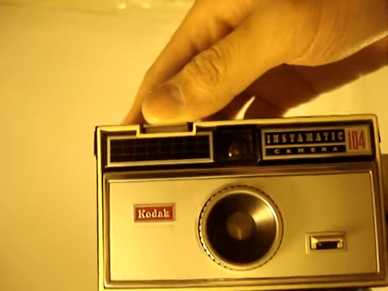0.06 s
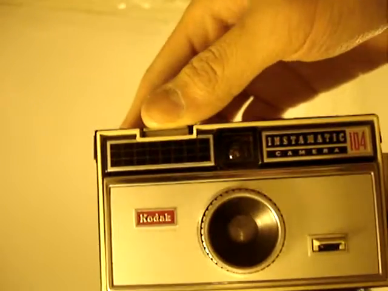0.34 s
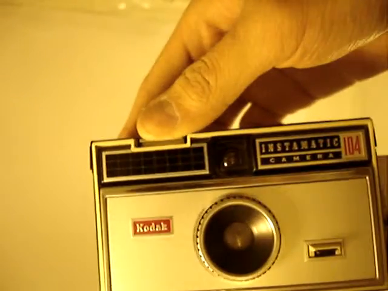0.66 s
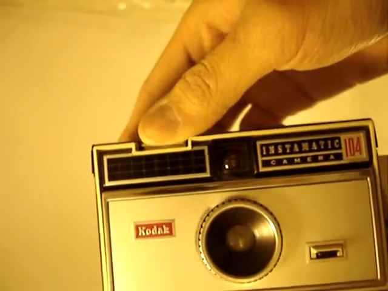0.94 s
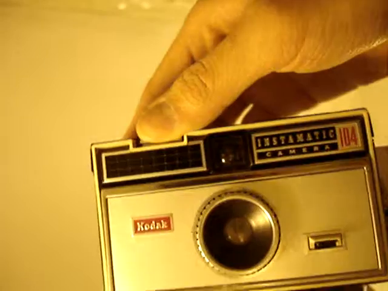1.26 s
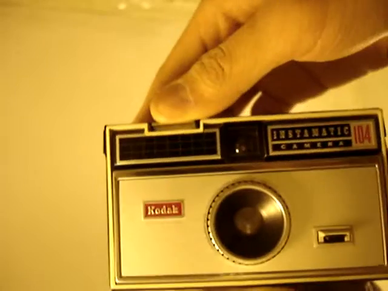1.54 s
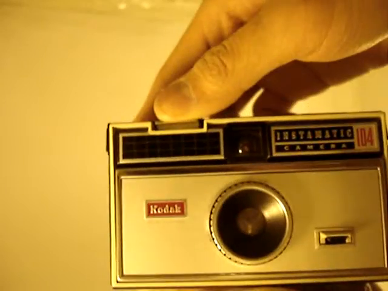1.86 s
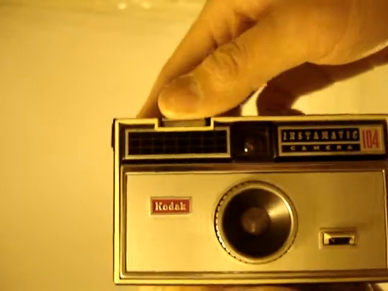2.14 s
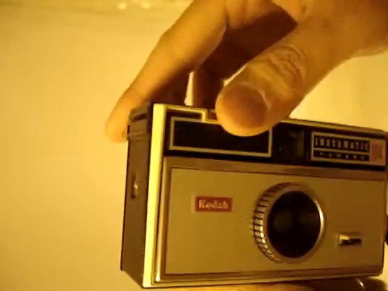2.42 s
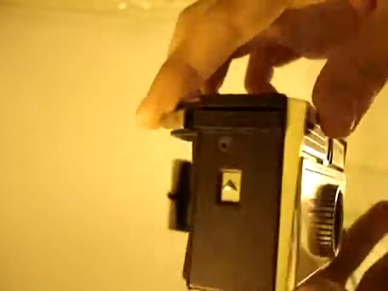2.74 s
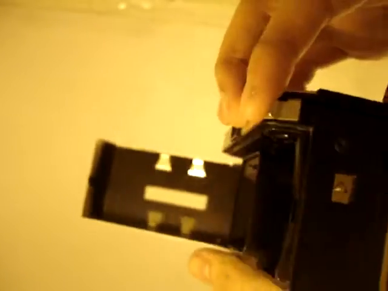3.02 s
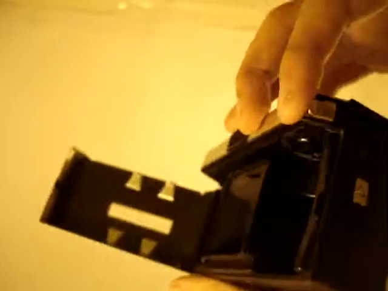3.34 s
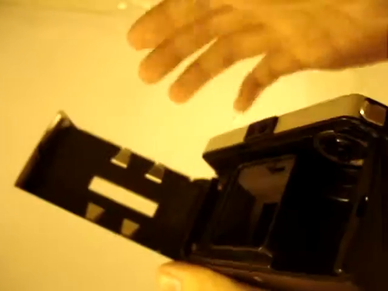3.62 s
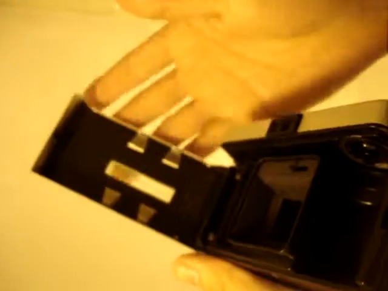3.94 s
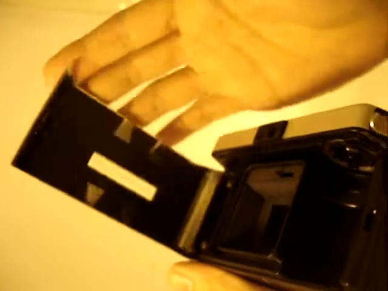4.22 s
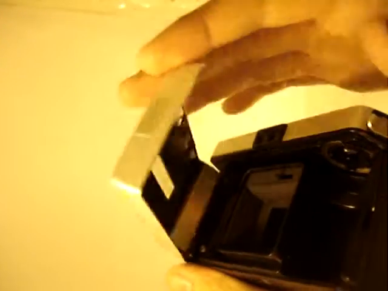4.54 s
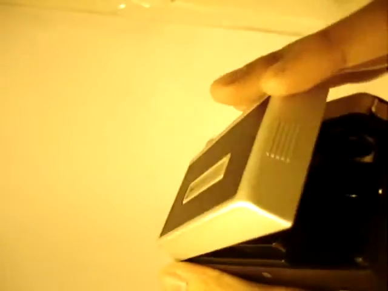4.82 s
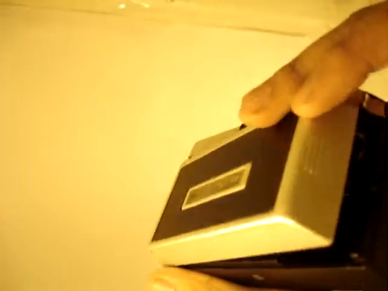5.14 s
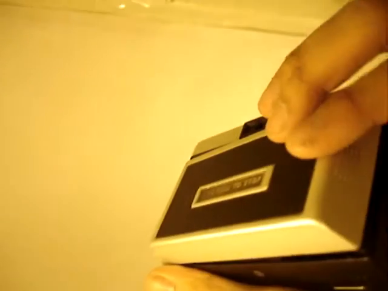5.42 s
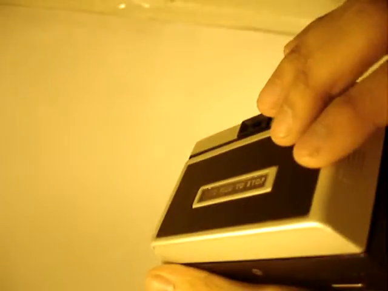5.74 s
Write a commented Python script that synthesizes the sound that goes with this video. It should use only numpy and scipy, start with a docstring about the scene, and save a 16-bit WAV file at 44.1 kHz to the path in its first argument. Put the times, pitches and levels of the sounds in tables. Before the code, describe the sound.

Quiet hiss, mains buzz and a thin whine run throughout. A small film camera gives two faint knocks, then its shutter snaps sharply and the release springs back with metallic clicks. Fingers rub softly on the case while the hinged back is unlatched and swung open with light clicks. Finally the back claps shut, followed by two dull knocks. The microphone is close, in a hard-walled room with a short echo.

```python
"""First comes a quiet hiss with mains buzz and a thin whine, then two faint knocks on a small film camera.
Close by, its shutter snaps and the release springs back; fingers rub the case, and the hinged back
is unlatched, swung open and clapped shut. Each contact chatters briefly, rings the metal works or
the hollow case, and echoes in a hard-walled room. The recorder turns itself down at the loud snaps
and creeps back up over seconds."""
import sys
import numpy as np
from scipy import signal
from scipy.fft import rfft, irfft
from scipy.io import wavfile
from scipy.ndimage import uniform_filter1d, minimum_filter1d

SR = 44100
rng = np.random.default_rng(int(sys.argv[2]) if len(sys.argv) > 2 else 0)


def transcribe(signal):
    """Save signal, clipped to [-1, 1], as a 16-bit WAV file at the path in sys.argv[1]."""
    frames = np.atleast_2d(signal).T
    limited = np.clip(frames, -1, 1)
    pcm = np.round(limited * 32767).astype(np.int16)
    wavfile.write(sys.argv[1], SR, pcm)


N = 263718
SPAN = 32768  # samples set aside for one short sound
TOP_HZ = 10030  # the recorder cuts off above this
TIME = np.arange(N) / SR
AGE = TIME[:SPAN]  # seconds since a short sound began
FREQS = np.fft.rfftfreq(SPAN, 1 / SR)


def undb(db):
    """Turn decibels into a number to multiply by."""
    return 10 ** (np.asarray(db) / 20)


def along(points, hz):
    """Read between (frequency, value) points, with octaves evenly spaced."""
    f, value = np.transpose(points)
    return np.interp(np.log(hz + 1), np.log(f), value)


def add(out, s, sound):
    """Mix a sound in, starting at s seconds."""
    start = int(s * SR)
    out[start:start + len(sound)] += sound[:len(out) - start]


def resonance(hz, width):
    """A filter that passes hz fully and fades away on both sides."""
    return 1j * FREQS * width / (hz ** 2 - FREQS ** 2 + 1j * FREQS * width)


def unit_power(response):
    """Scale a filter to an average power of 1 below TOP_HZ."""
    return response / np.sqrt(np.mean(np.abs(response[FREQS < TOP_HZ]) ** 2))


def causal(gain):
    """The quickest filter with this tone colour that never sounds before it is struck."""
    cepstrum = irfft(np.log(gain + np.finfo(float).eps))
    cepstrum[1:SPAN // 2] *= 2
    cepstrum[SPAN // 2 + 1:] = 0
    return np.exp(rfft(cepstrum))


def flatten(burst, smooth_hz):
    """The spectrum of a burst with its broad tone colour evened out, leaving the fine grain."""
    spectrum = rfft(burst)
    power = uniform_filter1d(np.abs(spectrum) ** 2, int(smooth_hz * SPAN / SR) + 1)
    return spectrum / causal(np.sqrt(np.abs(power)))


def noise(colour):
    """Noise of strength 1, coloured by (frequency, level) points."""
    gain = undb(along(colour, np.fft.rfftfreq(N, 1 / SR)))
    x = irfft(rfft(rng.standard_normal(N)) * gain, N)
    return x / x.std()


# Tone colour of the room's low rush: f/Hz, relative level/dB
RUSH_COLOUR = [(25, -2.5), (60, -3), (130, 0), (240, 6.5), (400, 1), (800, -1), (1500, -7), (3000, -13),
               (8000, -44)]
def room_rush(level_db=-60):
    """The quiet room gives a steady, low rush."""
    return undb(level_db) * noise(RUSH_COLOUR)


# Tone colour of the buzz: f/Hz, relative level/dB
BUZZ_COLOUR = [(60, -11.5), (130, -7.5), (230, 0), (420, -1), (850, -5), (1500, -16), (4000, -34.5)]
def mains_buzz(level_db=-63, mains_hz=60, scatter_db=3):
    """Each cycle of the mains power makes one small spike of uneven size."""
    cycles = np.arange(0, N, SR / mains_hz).astype(int)
    spikes = np.zeros(N)
    spikes[cycles] = -undb(scatter_db * rng.standard_normal(len(cycles)))
    pulse = irfft(causal(undb(along(BUZZ_COLOUR, FREQS))))
    buzz = signal.fftconvolve(spikes - spikes.mean(), pulse)[:N]
    return undb(level_db) * buzz / buzz.std()


# Tone colour of the hiss, also used for the palms: f/Hz, relative level/dB
HISS_COLOUR = [(30, -15), (500, 0), (1500, 2.5), (3000, 0), (6000, -2), (8000, -7.5), (10000, -27.5)]
def microphone_hiss(level_db=-63.5):
    """The microphone hisses steadily."""
    return undb(level_db) * noise(HISS_COLOUR)


# Tone colour of the recorder's bright hiss: f/Hz, relative level/dB
RECORDER_COLOUR = [(30, -59), (3000, 1.5), (6000, 2.5), (8500, 7.5), (10000, 4), (12000, -20)]
def recorder_noise(gain_db, hiss_db=-66.5, whine_db=-65.5, whine_hz=8018, restart_hz=31.25, follow=0.77):
    """The electronics hiss and whine; the whine follows a share of each change in gain."""
    whine = np.sqrt(2) * np.sin(2 * np.pi * whine_hz * (TIME % (1 / restart_hz)))  # restarts make it buzz
    return noise(RECORDER_COLOUR) * undb(hiss_db) + whine * undb(whine_db + follow * gain_db)


# Time an echo takes to fade by 60 dB at a dryness of 1: f/Hz, fade time/s
ECHO_FADE = [(100, 0.24), (600, 0.56), (1200, 0.46), (2500, 0.35), (5000, 0.36), (10000, 0.24)]
def room_echo(gap_s, dryness, build_s=0.0054, early_db=3, early_s=0.0062):
    """After a gap, near surfaces answer, then the walls; the middle pitches last longest."""
    white, tail = rfft(rng.standard_normal(SPAN)), 0
    edges = np.r_[0, np.geomspace(200, SR / 2, 12)]
    for lo, hi in zip(edges, edges[1:]):
        band = irfft(white * (FREQS >= lo) * (FREQS < hi))
        tail = tail + band * np.exp(-np.log(1000) * dryness * AGE / along(ECHO_FADE, (lo + hi) / 2))
    since = np.maximum(AGE - gap_s, 0)
    build_up = 1 - np.exp(-since / build_s)
    early_boost = undb(early_db * np.exp(-since / early_s))
    return flatten(tail * build_up * early_boost, smooth_hz=680)


# How loud the hands are as they turn the camera over: t/s, level/dB
PALM_LEVELS = [(2.2, -63.5), (2.5, -53.5), (3.4, -57), (4.4, -62), (5.6, -70.5)]
def palms(flutter_db=1.0, flutter_hz=22):
    """Palms shift on the case with a soft, uneven hiss."""
    flutter = np.interp(TIME * flutter_hz, np.arange(SPAN), rng.standard_normal(SPAN))
    level_db = np.interp(TIME, *np.transpose(PALM_LEVELS), left=-np.inf)
    return noise(HISS_COLOUR) * undb(level_db + flutter_db * flutter)


# Fingers sliding on the case: t/s, length/s, level/dB, ringing f/Hz
FINGER_RUBS = [(2.598, 0.11, -54.5, 2800), (2.607, 0.076, -52.5, 950), (2.901, 0.14, -49, 2520),
               (3.034, 0.11, -49, 2480), (3.206, 0.13, -50.5, 2800), (3.448, .12, -56, 4560),
               (4.103, 0.088, -59, 4500), (5.245, 0.076, -55, 2580)]
def fingers(grain_db=5, width_hz=400, scrape_db=-10):
    """Skin catches and slips in tiny steps: a broad scrape that rings one note of the case."""
    out = np.zeros(N)
    for s, length, db, hz in FINGER_RUBS:
        slips = rng.standard_normal(SPAN)
        slips *= undb(grain_db * np.repeat(rng.standard_normal(SPAN // 64), 64))
        rub = irfft(rfft(slips) * (resonance(hz, width_hz) + undb(scrape_db) * resonance(hz, 2 * hz)))
        swell = np.sin(np.pi * np.minimum(AGE / length, 1))
        add(out, s, rub / rub.std() * undb(db) * swell)
    return out


# Low thumps at the sharper snaps: t/s, level/dB
LOW_THUMPS = [(1.058, -19.5), (1.473, -17.5), (1.647, -36.5), (3.272, -50), (3.984, -46.5), (5.654, -41.5)]
def thumps(swing_hz=4.4, decay_s=0.056, phase_rad=0.38, rise_s=0.0001):
    """Each low thump starts suddenly, swings slowly through zero and settles."""
    out = np.zeros(N)
    envelope = (1 - np.exp(-AGE / rise_s)) * np.exp(-AGE / decay_s)
    swing = envelope * np.cos(2 * np.pi * swing_hz * AGE + phase_rad)
    for s, db in LOW_THUMPS:
        add(out, s, undb(db) * swing)
    return out


def body(notes, crack, ring_db, damping):
    """A struck object rings with narrow notes over a broad crack; damping widens and shortens them."""
    ring = sum(undb(2 * db) * np.abs(resonance(hz, width * damping)) ** 2 for hz, width, db in notes)
    return causal(np.sqrt(undb(2 * along(crack, FREQS)) + undb(2 * ring_db) * ring))


# Notes the case rings with: f/Hz, width before damping/Hz, relative level/dB
CASE_NOTES = [(518, 41, -9.5), (729.7, 40, -11), (1192, 26, 1.5), (1730, 153, -1), (1945, 23, -4),
              (2240, 50, -6.5), (2467, 23, 0.5), (2780, 75, -3), (3830, 40, -5.5), (4080, 42, -13),
              (4220, 30, -14), (4360, 49, -13), (5800, 43, -21), (6150, 140, -17)]
# Tone colour of its dry crack: f/Hz, relative level/dB
CASE_COLOUR = [(60, -17), (170, -17), (260, -6.5), (380, -17), (510, -12), (620, -8), (750, 0.5), (1050, 7),
               (1400, -5), (1850, -2), (2900, -3), (3400, -2), (5000, -4), (7500, -4), (10000, -16)]
def hollow_case():
    """How the hollow plastic case answers a tap."""
    return body(CASE_NOTES, CASE_COLOUR, ring_db=11.0, damping=1.1)


# Notes the metal parts ring with: f/Hz, width before damping/Hz, relative level/dB
METAL_NOTES = [(1048, 46, -4.5), (1184, 104, -2), (1343, 53, -7), (1713, 42, -7.5), (1810, 50, -5.5),
               (2025, 66, -8), (2256, 30, -6.5), (2700, 29, -2), (2892, 60, -4), (3940, 110, -2.5),
               (4300, 48, -9), (4590, 115, -8), (5770, 210, -8), (6600, 60, -5), (6770, 65, -2.5),
               (7330, 99, -17), (8830, 70, -19), (9430, 83, -8)]
# Tone colour of their dry crack: f/Hz, relative level/dB
METAL_COLOUR = [(60, -40.5), (520, -7), (800, -5), (1150, -2.5), (1600, 2), (2000, 4), (3300, 2.5),
                (4200, 1.5), (7000, 4), (10000, 3)]
def metal_works():
    """How the metal parts inside the camera answer a tap."""
    return body(METAL_NOTES, METAL_COLOUR, ring_db=12.0, damping=1.05)


def contact(force, response, echo, cutoff_hz, spot_hz, spot_db, bass_hz, spot_width):
    """A force rings an object and the room; softness dulls it, and the spot touched boosts one pitch."""
    # a small object sends little sound below bass_hz into the room
    walls = echo * causal(FREQS ** 2 / (FREQS ** 2 + bass_hz ** 2) + 0.0043)
    spot = 1 + (undb(spot_db) - 1) * resonance(spot_hz, spot_hz * spot_width)
    colour = response * causal(1 / np.sqrt(1 + (FREQS / cutoff_hz) ** 4))
    direct = unit_power(colour * spot) * flatten(force, smooth_hz=500)
    # the walls hear the object from all sides, which evens out its peaks and dips
    scattered = unit_power(colour * np.sqrt(spot)) * flatten(force, smooth_hz=30)
    return irfft(direct + walls * scattered)


def blows(table, response, echo, chatter_ms, halving_db, tick_ms, bass_hz, hard_hz=10000):
    """Each blow is a tick and a dying chatter, which is shorter for stronger or duller blows."""
    out = np.zeros(N)
    for s, db, cutoff_hz, spot_hz in table:
        decay_ms = chatter_ms * 2 ** (-db / halving_db) * (cutoff_hz / hard_hz) ** 0.5
        chatter = rng.standard_normal(SPAN) * np.exp(-AGE * 1e3 / decay_ms)
        force = chatter / np.linalg.norm(chatter)
        force[0] += tick_ms / decay_ms  # the opening tick
        hit = contact(force, response, echo, cutoff_hz, spot_hz,
                      spot_db=5.5, bass_hz=bass_hz, spot_width=0.15)
        add(out, s, undb(db) * hit)
    return out


# Knocks, ending with the back clapped shut: t/s, level/dB, dull above f/Hz, boosted f/Hz
CASE_KNOCKS = [ (0.4774, -25.5, 8000, 3520), (0.5156, -16, 7000, 1390), (3.2707, -11, 9000, 2400),
               (3.2925, -12.5, 6000, 1610), (4.7024, -24.5, 6000, 2310), (5.4622, -27.5, 6010, 2530),
               (5.6539, 8.5, 14000, 2800), (5.6580, 4.5, 5100, 1930), (5.7666, -2.5, 1470, 1110),
               (5.8545, -3, 1330, 1050)]
def knocks(echo, echo_db=-6.5):
    """Short knocks ring the hollow case."""
    return blows(CASE_KNOCKS, hollow_case(), echo * undb(echo_db),
                 chatter_ms=2.72, halving_db=19, tick_ms=0.58, bass_hz=293)


# Release lever, latch and hinge: t/s, level/dB, length/ms, dull above f/Hz, boosted f/Hz, boost/dB
METAL_SLIDES = [ (1.4620, 18.5, 12.3, 4600, 1220, 10), (1.4670, 21, 6.2, 12000, 4100, 9.5),
                (1.4715, 19.5, 6.2, 13100, 5700, 12.5), (1.6420, 11, 9.6, 12500, 4940, 9),
                (1.6520, 3.5, 20, 11000, 6500, 5), (1.9430, -16, 6.2, 6000, 4220, 13.5),
                (2.043, -21, 6, 7000, 4300, 4), (2.5552, -10.5, 11.5, 8100, 4860, 26),
                (3.2700, -11, 8, 7000, 4850, 19), (3.9352, -14, 8.9, 3700, 4320, 20),
                (3.9520, -20, 7.2, 4300, 4450, 16), (3.971, -1, 34.4, 5600, 4220, 15.5)]
def sliding_parts(echo, echo_db=-9.5):
    """A spring slides a metal part home; it chatters in a short burst that swells and dies."""
    out = np.zeros(N)
    metal, echo = metal_works(), echo * undb(echo_db)
    for s, db, length_ms, cutoff_hz, spot_hz, spot_db in METAL_SLIDES:
        swell = np.sin(np.pi * np.minimum(AGE * 1e3 / length_ms, 1))
        force = rng.standard_normal(SPAN) * swell
        slide = contact(force, metal, echo, cutoff_hz, spot_hz, spot_db, bass_hz=450, spot_width=0.087)
        add(out, s, undb(db) * slide)
    return out


# The shutter's blows: t/s, level/dB, dull above f/Hz, boosted f/Hz
SHUTTER_BLOWS = [ (1.0560, 11.5, 12900, 1950), (1.0657, 11.5, 7800, 1200), (1.0806, 6.5, 10900, 2600),
                 (1.0925, 4, 10000, 6700)]
def shutter(echo, echo_db=-3):
    """Four quick blows ring the metal works and blend into one snap."""
    return blows(SHUTTER_BLOWS, metal_works(), echo * undb(echo_db),
                 chatter_ms=6.3, halving_db=6.0, tick_ms=0.8, bass_hz=450)


def scene():
    """The camera and the hands holding it, over the steady background, in one channel."""
    metal_echo = room_echo(gap_s=0.0044, dryness=1.0)
    case_echo = room_echo(gap_s=0.002, dryness=1.86)
    camera = shutter(metal_echo) + sliding_parts(metal_echo) + knocks(case_echo)
    hands = fingers() + palms()
    background = room_rush() + mains_buzz() + microphone_hiss()
    return (background + hands + thumps() + camera)[None]


def auto_gain_db(x, threshold_db=-25, ratio=5.46, recovery_db_per_s=3, average_s=0.019):
    """The gain (the recorder's volume) drops just ahead of a loud snap and creeps back steadily."""
    window = int(average_s * SR)
    heard = signal.sosfilt(signal.butter(4, [300, TOP_HZ], "bandpass", fs=SR, output="sos"), x)
    level_db = 10 * np.log10(np.maximum(uniform_filter1d(heard ** 2, window), np.finfo(float).eps))
    cut_db = np.maximum(level_db - threshold_db, 0) * (1 - 1 / ratio)
    recovered_db = recovery_db_per_s * TIME
    gain_db = recovered_db - np.maximum.accumulate(cut_db + recovered_db)
    return minimum_filter1d(gain_db, 2 * window)


def record(dry):
    """The recorder adjusts its volume, adds its own hiss and whine, and cuts the highest treble."""
    gain_db = auto_gain_db(dry[0])
    mix = dry * undb(gain_db) + recorder_noise(gain_db)
    return signal.sosfilt(signal.ellip(12, .2, 70, TOP_HZ, fs=SR, output="sos"), mix)


dry = scene()
out = record(dry)
transcribe(out)
```